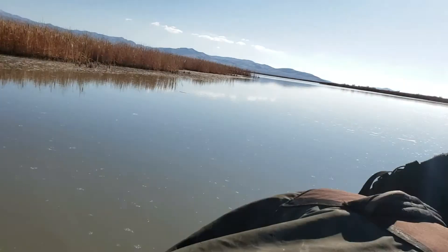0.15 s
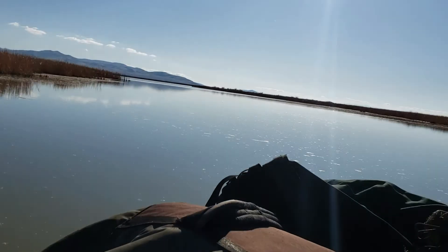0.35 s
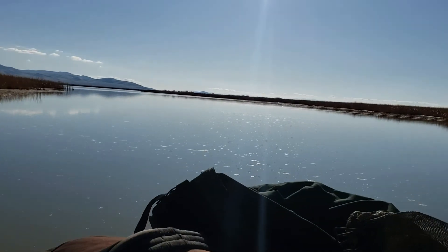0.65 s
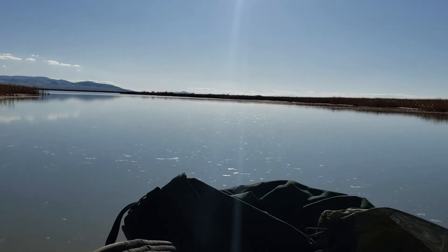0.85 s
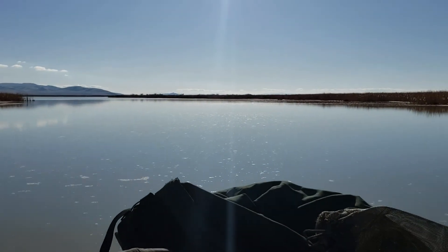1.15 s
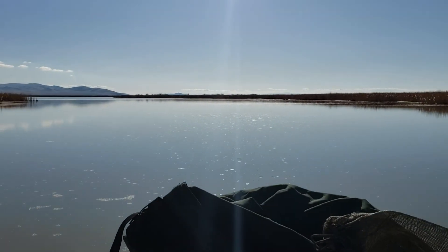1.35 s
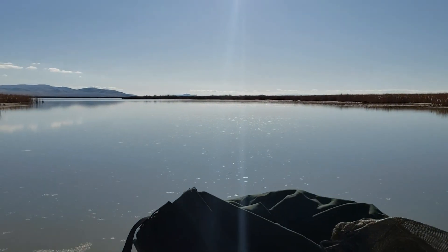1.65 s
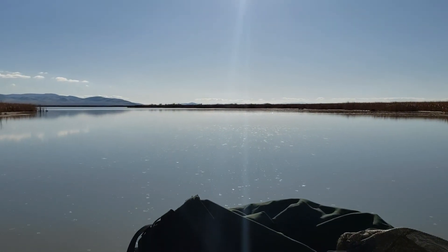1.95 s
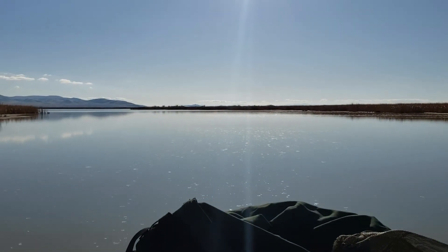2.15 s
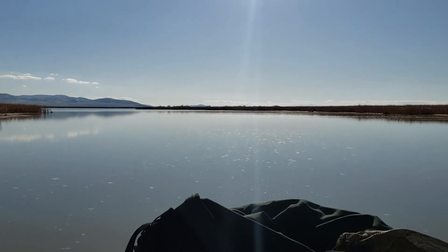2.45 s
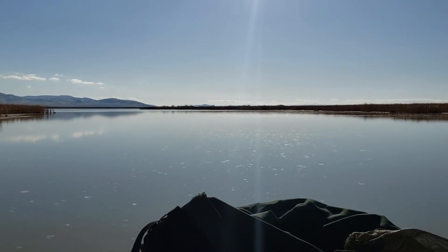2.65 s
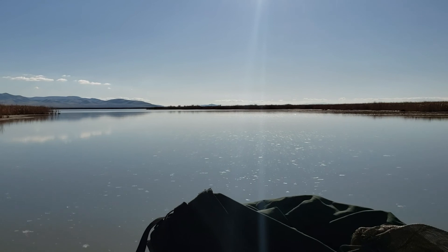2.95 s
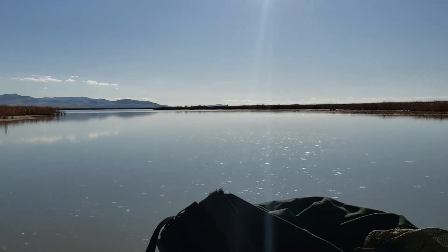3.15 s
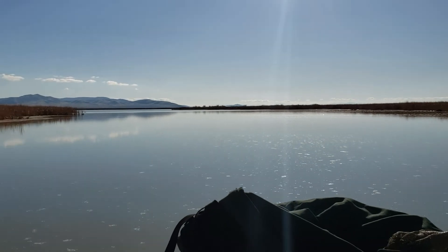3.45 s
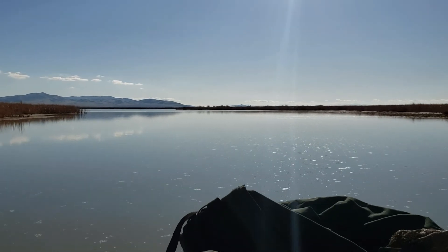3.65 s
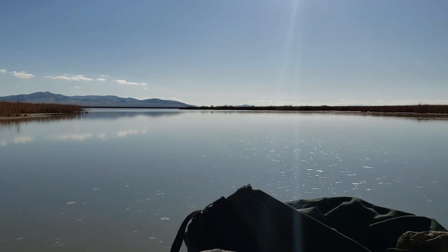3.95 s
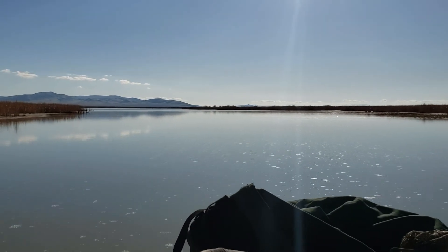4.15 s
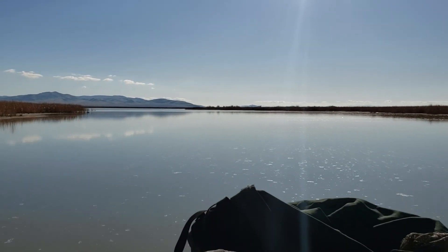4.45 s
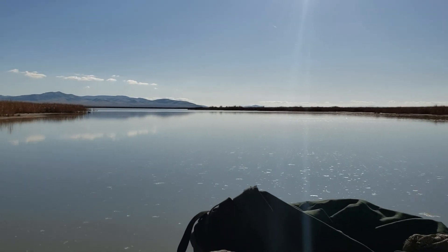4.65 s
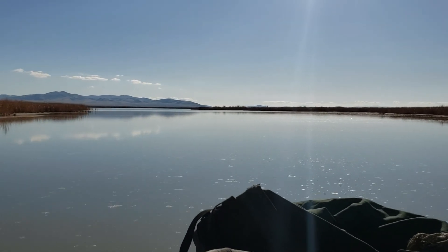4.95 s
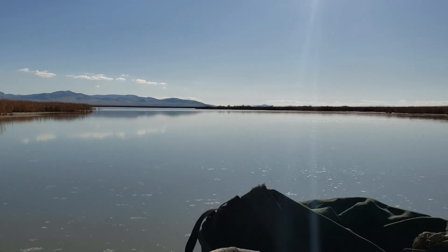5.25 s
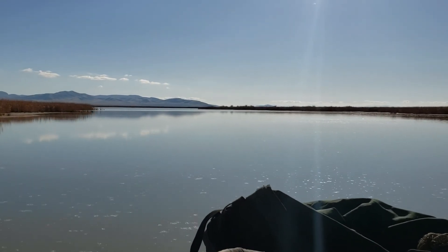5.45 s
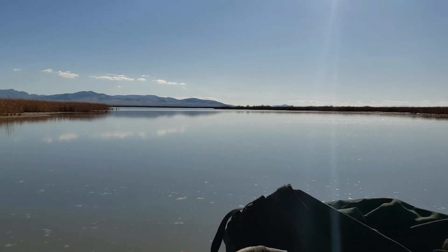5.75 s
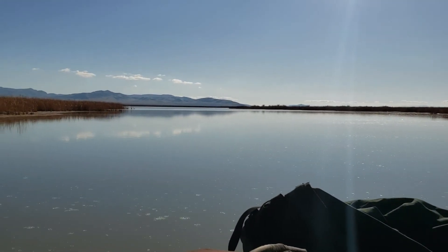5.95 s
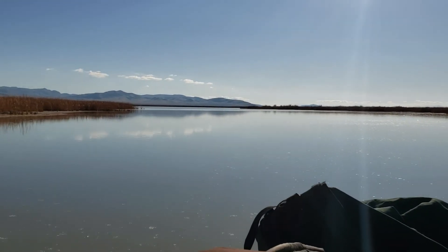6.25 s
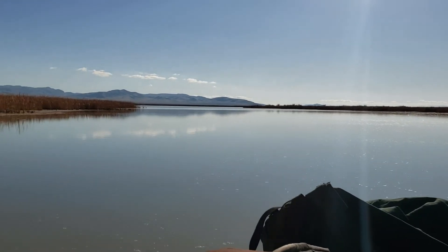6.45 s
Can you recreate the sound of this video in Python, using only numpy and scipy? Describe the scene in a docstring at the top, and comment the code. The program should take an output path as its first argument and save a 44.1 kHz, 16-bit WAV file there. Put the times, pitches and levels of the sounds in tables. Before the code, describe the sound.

A longtail-style boat engine runs steadily throughout, its firing so rapid that the beats fuse into a coarse buzzing growl with throaty exhaust, valve clatter and a faint thin whine. Hull wash and fine spray start loud, quickly ease, then swell gradually. Low wind puffs bump the onboard stereo microphone; the open water adds almost no echo.

```python
"""A hard single-cylinder beat, about 33 a second: the four-stroke engine of a longtail boat on a calm marsh,
heard on board. Pulse trains ring the exhaust and intake ducts; sines make the shaft drone and the whine;
noise bursts make the valve clatter; shaped noise makes the blow, the roar and a rasp pulsing every cycle.
Water and spray hiss along the hull, loud at first, then building slowly to the end: noise with the same pulse.
Head wind thumps on the microphone: low noise under short swells."""
import sys
import numpy as np
from scipy import signal
from scipy.fft import rfft, irfft, next_fast_len
from scipy.io import wavfile
from scipy.ndimage import map_coordinates

SR = 44100
rng = np.random.default_rng(int(sys.argv[2]) if len(sys.argv) > 2 else 0)


def dump_mix(stems):
    """Bounce the given channels to the path in sys.argv[1] as a 16-bit WAV at rate SR."""
    frames = np.atleast_2d(stems).T  # one column per channel
    limited = np.clip(frames, -1, 1)  # hard clip at full scale
    pcm = np.round(limited * 32767).astype(np.int16)
    wavfile.write(sys.argv[1], SR, pcm)


N = 291932


def amp(db):
    """Decibels to amplitude gain."""
    return 10 ** (np.asarray(db) / 20)


def unit(x):
    """x at rms 1."""
    return x / np.sqrt(np.mean(x ** 2) + 1e-20)


def along(points, hz):
    """(f/Hz, value) points interpolated on a log frequency axis."""
    f, v = np.transpose(points)
    return np.interp(np.log(hz + 1), np.log(f + 1), v)


def curves(rows):
    """One value per sample for each column after the time."""
    s, *cols = np.transpose(rows)
    t = np.arange(N) / SR
    return [np.interp(t, s, c) for c in cols]


def ease(start_s, end_s):
    """Raised-cosine move from 0 to 1 between two times."""
    share = np.clip((np.arange(N) / SR - start_s) / (end_s - start_s), 0, 1)
    return (1 - np.cos(np.pi * share)) / 2


def wobble(rate_hz):
    """Smooth random curve, rate_hz knots a second."""
    knots = rng.standard_normal(int(N * rate_hz / SR) + 4)
    return map_coordinates(knots, [np.arange(N) * rate_hz / SR])


def noise():
    """Two unrelated white noises."""
    return rng.standard_normal((2, N))


def filtered(x, response):
    """x times a response of frequency."""
    size = next_fast_len(N + SR // 4)
    spectrum = rfft(x, size) * response(np.fft.rfftfreq(size, 1 / SR))
    return irfft(spectrum, size)[..., :N]


# left-right likeness of diffuse sound: f/Hz, correlation (1 = identical)
LIKENESS = [(100, 0.54), (500, 1), (1150, 0.3), (1500, 0.46), (3000, 0.54), (4600, 0.22), (7000, 0.11),
            (15000, .03)]


def spread(pair, spectrum, near=1):
    """Unrelated pair to coloured left and right, mid at rms 1; near scales their likeness."""
    def response(hz):
        turn = np.arccos(np.clip(near * along(LIKENESS, hz), -1, 1)) / 2
        return amp(along(spectrum, hz)) * [np.cos(turn), np.sin(turn)]
    mid, side = filtered(pair, response)
    return np.array([mid + side, mid - side]) / np.std(mid)


def pulses(cycle, place, scatter_db, jitter_s):
    """One pulse per engine cycle at a place in it (0-1), uneven in size and timing."""
    turns = np.arange(int(cycle[-1]) + 1) + place % 1
    chance = rng.standard_normal((256, 2))[:len(turns)]
    at = np.interp(turns, cycle, np.arange(N)) + jitter_s * SR * chance[:, 0]
    at = np.clip(at, 0, N - 2)
    inside = (turns > cycle[0]) * (turns < cycle[-1])
    size = amp(scatter_db * chance[:, 1]) * inside
    first = at.astype(int)
    late_share = at % 1  # pulse split over two samples
    early = np.bincount(first, size * (1 - late_share), N)
    return early + np.bincount(first + 1, size * late_share, N)


def duct(puffs, spectrum):
    """Each puff of gas sets a duct ringing: minimum-phase response, rms 1."""
    size = 4096
    cepstrum = irfft(np.log(amp(along(spectrum, np.fft.rfftfreq(size, 1 / SR)))))
    cepstrum[1:size // 2] *= 2  # causal ring: sharp front, then decay
    cepstrum[size // 2 + 1:] = 0
    ring = irfft(np.exp(rfft(cepstrum)))
    return unit(signal.fftconvolve(puffs, ring)[:N])


def throb(cycle, depth_db):
    """Gain pulsing once a cycle between exhaust barks, less so on each shaft turn; rms 1."""
    angle = 2 * np.pi * (cycle - .92)
    return unit(amp(depth_db * (np.cos(angle) + 0.53 * np.cos(2 * angle))))


# engine effort: t/s, level/dB
EFFORT = [(0, 0.4), (.7, -1), (1.6, .5), (4.1, -1.35), (5.4, 1), (6.6, 0.8)]
# shaft drone, first shaft order: t/s, level/dB
DRONE_LEVEL = [(0, -21.5), (1, -20.5), (2.8, -20), (3.5, -24.5), (5, -22.5), (6.6, -21)]
# rasp: t/s, level/dB
RASP_LEVEL = [(0, -36.5), (.45, -38.5), (.9, -35.5), (3.4, -36.5), (5.4, -34), (6.6, -35.5)]
# throaty roar: t/s, level/dB
ROAR_LEVEL = [(0, -33.5), (.5, -37.5), (1.1, -32.5), (3.3, -38), (5.8, -36.5), (6.6, -34)]
# gas leaving the pipe, relative noise spectrum: f/Hz, level/dB
BLOW_SPECTRUM = [(100, -15), (250, -3.5), (380, -0.5), (480, 1), (620, 2.5), (760, -7.5), (1100, -23),
                 (3000, -57)]
# rasp, relative noise spectrum: f/Hz, level/dB
RASP_SPECTRUM = [(250, -19), (500, -5), (800, -5.5), (1050, -6.5), (1310, -5), (1500, 2.5), (1730, -2),
                 (2050, 1), (2350, -6), (2700, -4.5), (3200, -11.5), (4400, -20.5), (7500, -48)]
# throaty roar, relative noise spectrum: f/Hz, level/dB
ROAR_SPECTRUM = [(400, -22), (700, -8.5), (860, -1), (1020, 0.5), (1160, -2), (1350, -10.5), (2000, -33),
                 (5000, -79)]
INTAKE_DB, EXHAUST_DB, BLOW_DB = -25, -26, -34.5  # at 0 dB effort
INTAKE_GROWTH = 1.1  # dB per dB of effort
KNOCK_OVER_RASP_DB = -0.5
START_WHINE_DB, WHINE_CLEAR_S = -4.5, 0.95  # whine fainter at first


def engine(cycle):
    """Beats and blow follow effort; drone, clatter, whine, rasp and roar have their own levels."""
    effort_db, = curves(EFFORT)
    drone_db, = curves(DRONE_LEVEL)
    rasp_db, = curves(RASP_LEVEL)
    roar_db, = curves(ROAR_LEVEL)
    barks = amp(EXHAUST_DB + effort_db) * exhaust(cycle)
    gulps = amp(INTAKE_DB + INTAKE_GROWTH * effort_db + 0.48 * wobble(4.7)) * intake(cycle)
    beats = with_reflection(gulps + barks)
    blow = amp(BLOW_DB + effort_db) * spread(noise(), BLOW_SPECTRUM, near=0.7)
    shake = amp(drone_db) * drone(cycle)
    knocks = amp(rasp_db + KNOCK_OVER_RASP_DB) * clatter(cycle, t60_s=0.032)
    grain = throb(cycle, depth_db=2.0) * amp(1.1 * wobble(25) + 0.62 * wobble(300))
    rasp = amp(rasp_db) * spread(noise() * grain, RASP_SPECTRUM)
    roar = amp(roar_db) * spread(noise() * amp(1.4 * wobble(14)), ROAR_SPECTRUM)
    singing = amp(START_WHINE_DB * (1 - ease(0, WHINE_CLEAR_S))) * whine(cycle)
    return beats + blow + shake + knocks + rasp + roar + singing


# exhaust pipe ringing, relative: f/Hz, level/dB
PIPE_RING = [(30, -45), (130, -28), (240, -16), (266, -14), (299, -1.5), (332, 1), (365, 0.5), (399, -1.5),
             (432, 3), (465, -10), (565, -14), (900, -28), (6000, -90)]


def exhaust(cycle):
    """One bark through the pipe per firing."""
    return duct(pulses(cycle, place=.3, scatter_db=-1.27, jitter_s=.00003), PIPE_RING)


# intake duct ringing, relative: f/Hz, level/dB
INTAKE_RING = [(12, -45), (33, -22), (66, -28), (100, -6), (133, -20), (166, 0), (199, -2.5), (232, -8.5),
               (266, -16), (299, -17), (340, -32), (600, -60), (3000, -100)]


def intake(cycle):
    """The cylinder gulps air with a low thud, between exhaust barks."""
    return duct(pulses(cycle, place=.84, scatter_db=1.26, jitter_s=.00006), INTAKE_RING)


def with_reflection(x):
    """Weak echo off boat and water; sway shifts its delay, so single harmonics swell and fade."""
    delay_s, sway_s, echo_db = .012, .0011, -13
    late = np.arange(N) - SR * (delay_s + sway_s * wobble(1.316))
    return x + amp(echo_db) * np.interp(late, np.arange(N), x)


def drone(cycle):
    """Crankshaft, two turns a cycle, shakes the hull; connecting rod adds twice that rate."""
    crank = 2 * np.pi * (2 * cycle + .275)
    first = np.sin(crank) * amp(0.22 * wobble(11))
    second = np.sin(2 * crank) * amp(-12 + 1.25 * wobble(3.26))
    return np.sqrt(2) * (first + second)


# valve and piston knocks: place in the cycle (0-1), relative level/dB
KNOCKS = [(.05, -3.5), (0.259, -1.5), (0.449, 0.5), (0.623, -1.5), (0.819, -2.5)]
# engine block, relative noise spectrum: f/Hz, level/dB
BLOCK_SPECTRUM = [(300, -13.5), (470, -3), (640, 0.5), (860, 8.5), (1100, 1.5), (1330, -20), (1520, -1.5),
                  (1750, -3.5), (2200, 0), (2550, -10), (3300, -38), (4400, -16.5), (6000, -55),
                  (8000, -63)]


def clatter(cycle, t60_s):
    """Valves and piston knock on the block, each with its own short noise ring."""
    t = np.arange(SR // 20) / SR
    total = np.zeros((2, N))
    for place, db in KNOCKS:
        ring = rng.standard_normal((2, len(t))) * amp(-60 * t / t60_s)
        blows = pulses(cycle, place, scatter_db=-0.5, jitter_s=.00004)
        total += amp(db) * signal.fftconvolve(blows[None], ring, axes=1)[:, :N]
    return spread(total, BLOCK_SPECTRUM)


# singing engine orders: multiple of the firing rate, level/dB
WHINE_ORDERS = [(15, -47), (17, -43.5), (19, -43.5), (20, -44), (24, -41), (29, -50), (57, -53), (61, -46)]


def whine(cycle):
    """A few high engine orders sing as sines, wavering in strength and phase."""
    waver_db, waver_rad = 2.2, .6
    total = np.zeros(N)
    for order, db in WHINE_ORDERS:
        phase = 2 * np.pi * order * cycle + waver_rad * wobble(13)
        total += amp(db + waver_db * wobble(7)) * np.sin(phase)
    return np.sqrt(2) * total


TURN_END_S = .6  # microphones turn from the boat's side to the bow
# churned water, relative noise spectrum: f/Hz, level/dB
WATER_SPECTRUM = [(1200, -24), (2500, 5), (2750, 1), (3100, 4.5), (3700, 1), (4500, 0.5), (5100, -6.5),
                  (6500, -17.5), (7800, -30.5), (8800, -33.5), (11000, -47)]
# fine spray, relative noise spectrum: f/Hz, level/dB
SPRAY_SPECTRUM = [(7000, -39), (8800, -15), (9900, -2.5), (12200, -0.5), (13600, -4.5), (14700, 2),
                  (15600, 1.5)]
RISE_START_S, RISE_END_S = 2.4, 6.75
WATER_DB, WATER_SIDE_DB, WATER_RISE_DB = -43, 6.5, 4  # base, extra facing the side, later gain
SPRAY_DB, SPRAY_SIDE_DB, SPRAY_RISE_DB = -55.5, 6.5, 4.5


def wash(cycle):
    """Churned water and spray hiss, pulsing each engine cycle; loud alongside, then building ahead."""
    alongside = 1 - ease(0, TURN_END_S)
    rise = ease(RISE_START_S, RISE_END_S)
    water_db = WATER_DB + WATER_SIDE_DB * alongside + WATER_RISE_DB * rise
    spray_db = SPRAY_DB + SPRAY_SIDE_DB * alongside + SPRAY_RISE_DB * rise
    water_grain = throb(cycle, depth_db=1.55) * amp(0.66 * wobble(30) + 1.1 * wobble(400))
    spray_grain = throb(cycle, depth_db=0.8) * amp(.4 * wobble(18) + 1.0 * wobble(400))
    water = spread(noise() * water_grain, WATER_SPECTRUM)
    spray = spread(noise() * spray_grain, SPRAY_SPECTRUM)
    return amp(water_db) * water + amp(spray_db) * spray


# wind thumps: t/s, level/dB before THUMP_TRIM_DB, half length/s (power down to 1/e)
THUMPS = [(.2, -22.5, .075), (1.33, -25, .022), (1.76, -23, .04), (1.93, -23, .03), (2.21, -21.5, .035),
          (2.44, -26, .06), (2.92, -22, .032), (3.06, -23, .03), (3.28, -23, .045), (3.93, -24, .025),
          (4.93, -21.5, .02), (6.18, -24, .07), (6.47, -20, .035)]
THUMP_TRIM_DB = 0.5
# wind on the microphone, relative noise spectrum: f/Hz, level/dB
BUFFET_SPECTRUM = [(12, -25), (28, -14), (48, -7), (85, -1), (140, -4.5), (200, -10.5), (300, -10.5),
                   (500, -20), (1200, -55), (3000, -93)]


def wind(rest_db):
    """Eddies strike the microphone: short thumps over a light, lumpy rumble."""
    t = np.arange(N) / SR
    power = amp(rest_db + 2.4 * wobble(13)) ** 2
    for s, db, half_s in THUMPS:
        power = power + amp(db + THUMP_TRIM_DB) ** 2 * np.exp(-((t - s) / half_s) ** 2)
    return np.sqrt(power) * spread(noise(), BUFFET_SPECTRUM, near=.35)


# engine speed before slight random hunting: t/s, firing rate/Hz
FIRING_RATE = [(0.0, 33.13), (0.8, 33.47), (1.3, 33.29), (2.0, 33.06), (2.45, 33.54), (3.4, 33.12),
               (4.0, 33.19), (4.5, 33.12), (5.8, 33.2), (6.6, 33.06)]


def scene():
    """Firing rate integrates to an engine cycle count; engine and wash share it, wind is free."""
    rate_hz, = curves(FIRING_RATE)
    start_cycle, hunting_hz = .38, .04
    cycle = start_cycle + np.cumsum(rate_hz + hunting_hz * wobble(12)) / SR
    return engine(cycle) + wash(cycle) + wind(rest_db=-30.0)


# microphone balance: f/Hz, left minus right level/dB
BALANCE = [(60, 3), (400, 3.5), (750, 1.5), (1600, 3.5), (2350, -2), (2950, 2), (4400, -7), (5600, 3.5),
           (6500, 9.5), (7400, 12.5), (8600, 2.5), (13000, 2), (15200, 9.5)]
# sound bending round the microphone body: f/Hz, extra lead of left/rad
BODY_PHASE = [(100, -0.03), (1000, -0.27), (1400, -1.35), (2100, -0.89), (2500, 0.13), (3900, -0.42),
              (4300, 1.5), (4900, 1.5), (6000, 0)]
SIDE_LEAD_S, BOW_LEAD_S = .00009, 0.00016  # lead of left before and after the turn
TOP_HZ = 15800


def record(dry):
    """Two ports: left leads more as they turn to the bow; balance, body phase, band limit."""
    ports = np.array([[.5], [-.5]])
    lead_s = SIDE_LEAD_S + (BOW_LEAD_S - SIDE_LEAD_S) * ease(0, TURN_END_S)
    heard = np.array([
        map_coordinates(side, [np.arange(N) + port * lead_s * SR], mode="mirror")
        for side, port in zip(dry, ports)])
    soft_ends = signal.windows.tukey(N, .001)

    def response(hz):
        gain = amp(ports * along(BALANCE, hz))
        return gain * np.exp(1j * ports * along(BODY_PHASE, hz)) * (hz < TOP_HZ)
    return filtered(heard * soft_ends, response)


dry = scene()
out = record(dry)
dump_mix(out)
```